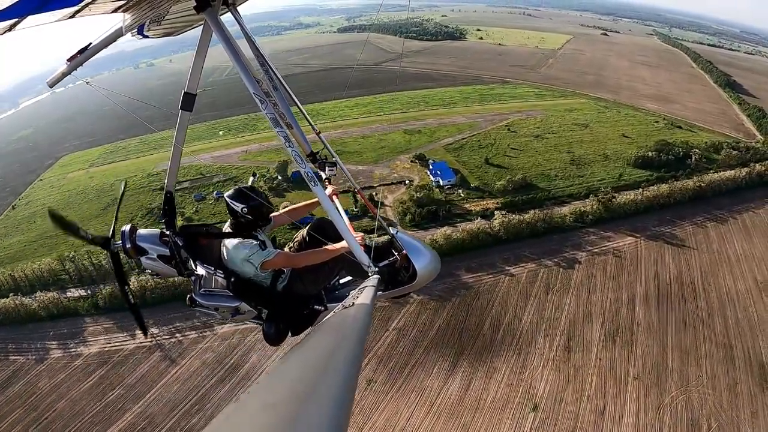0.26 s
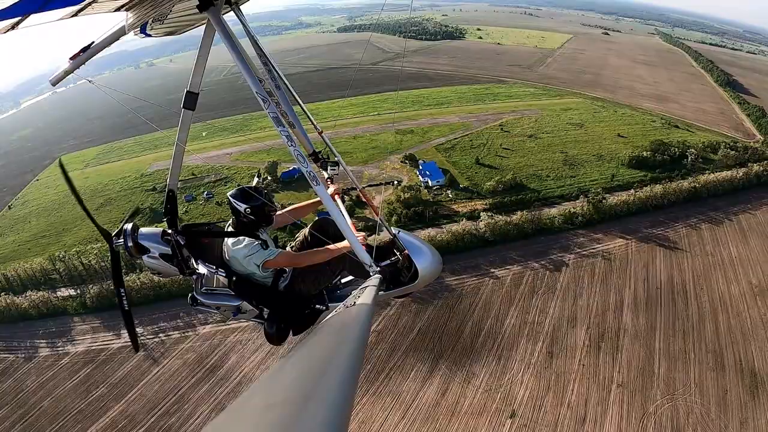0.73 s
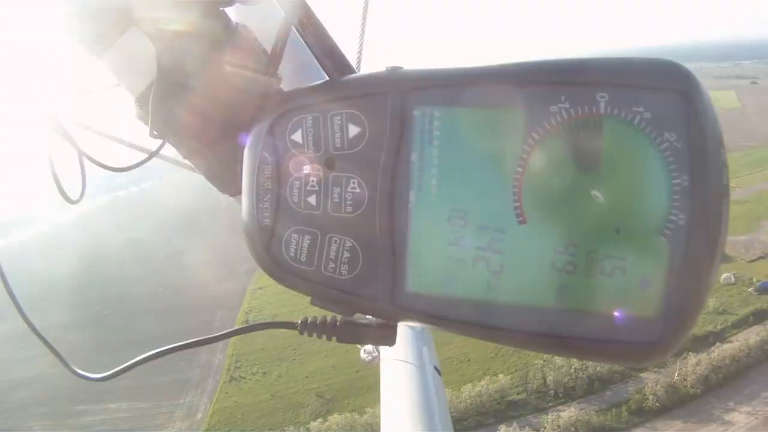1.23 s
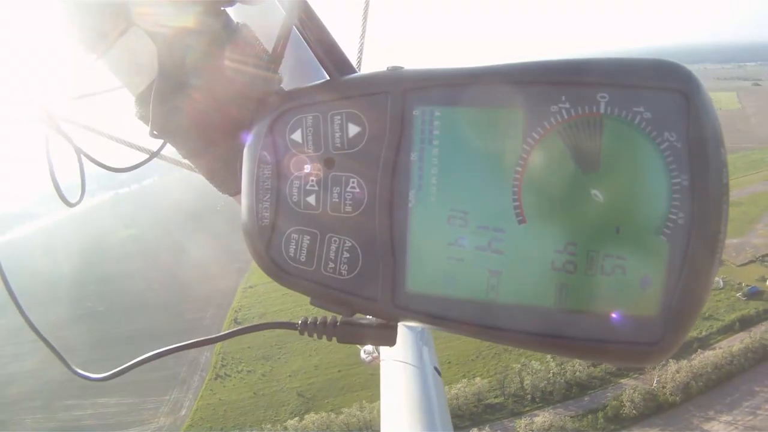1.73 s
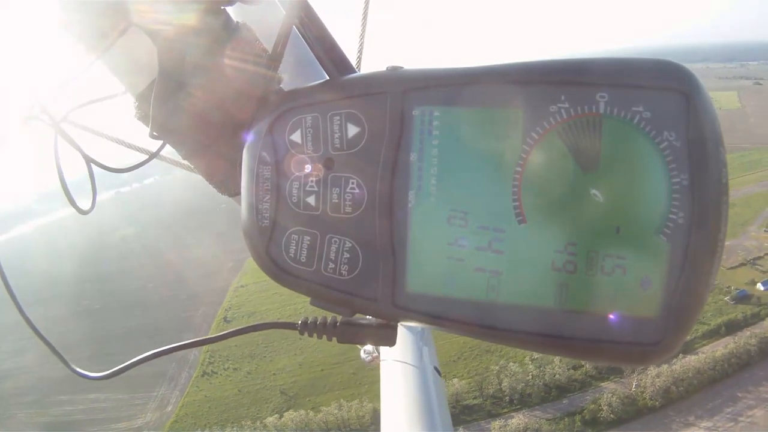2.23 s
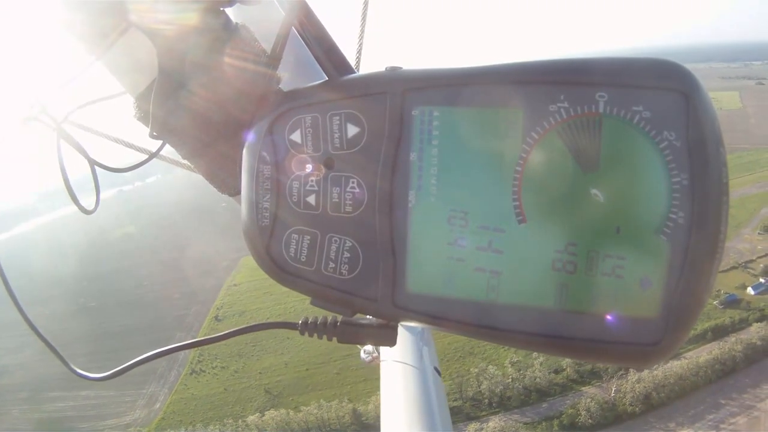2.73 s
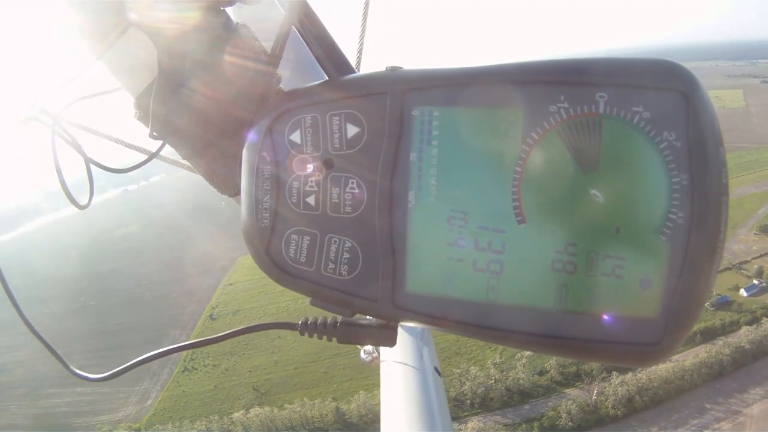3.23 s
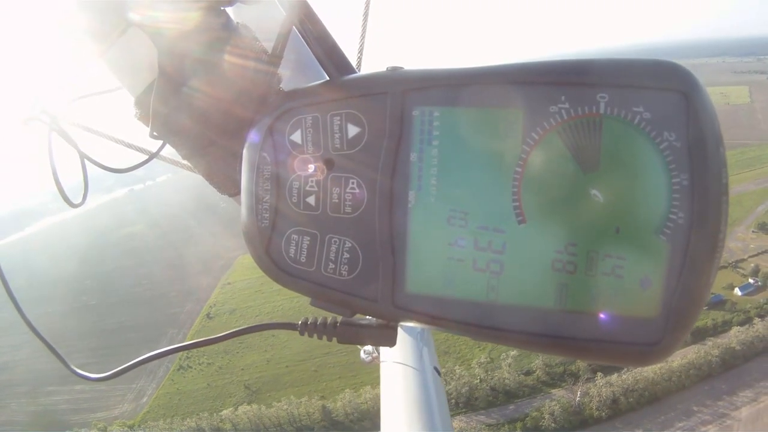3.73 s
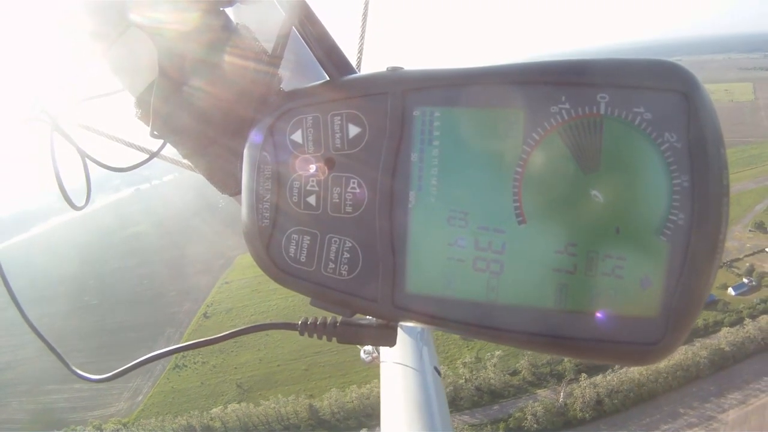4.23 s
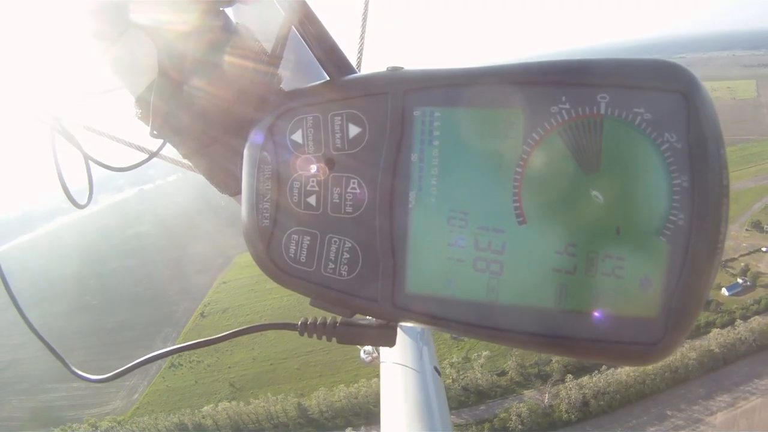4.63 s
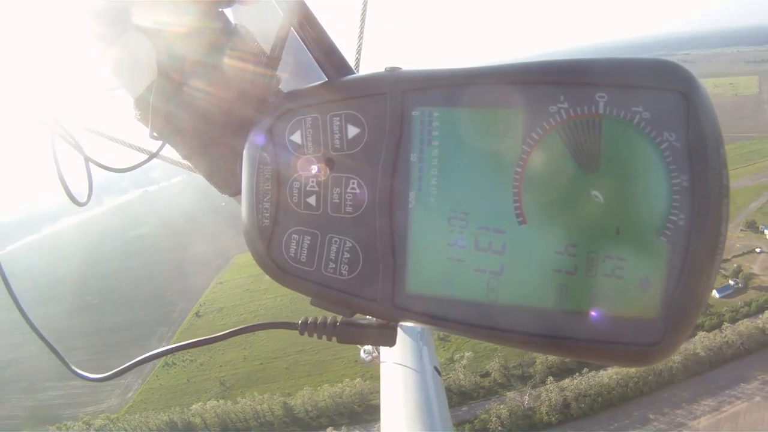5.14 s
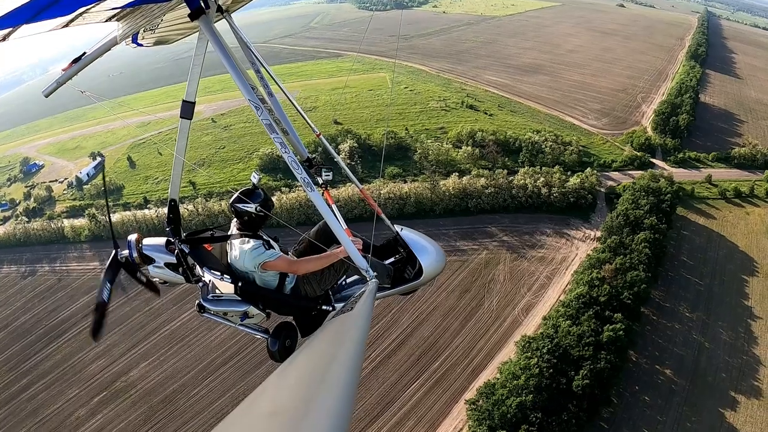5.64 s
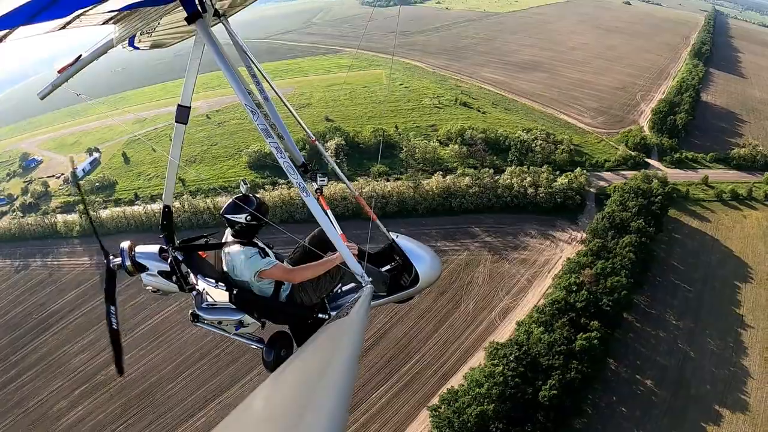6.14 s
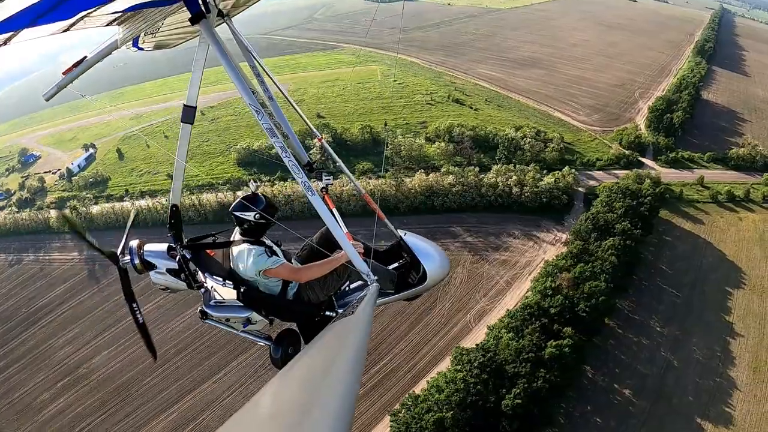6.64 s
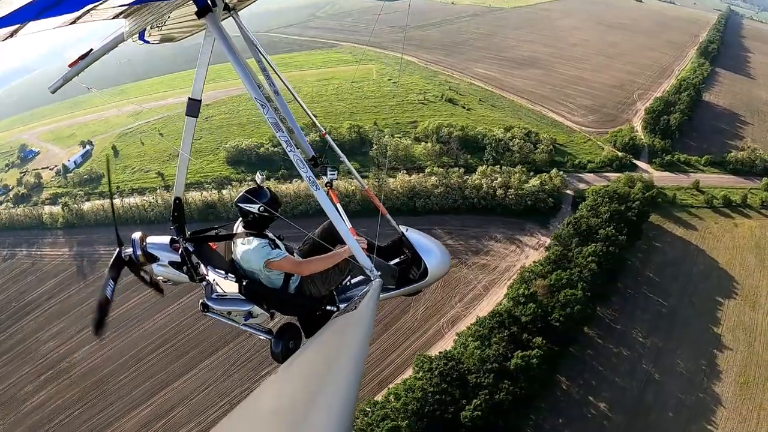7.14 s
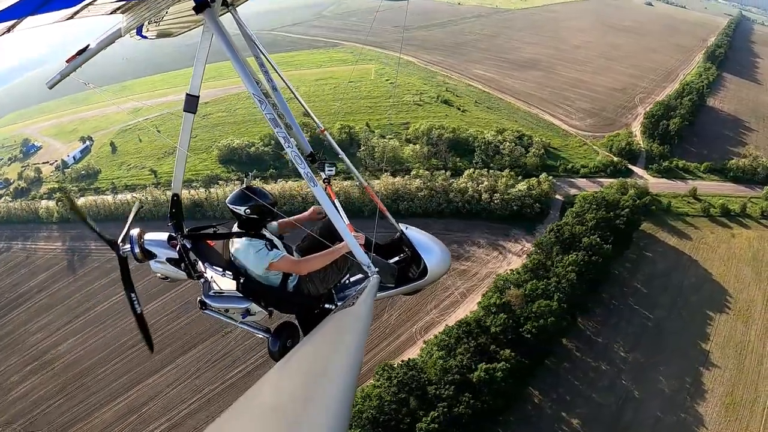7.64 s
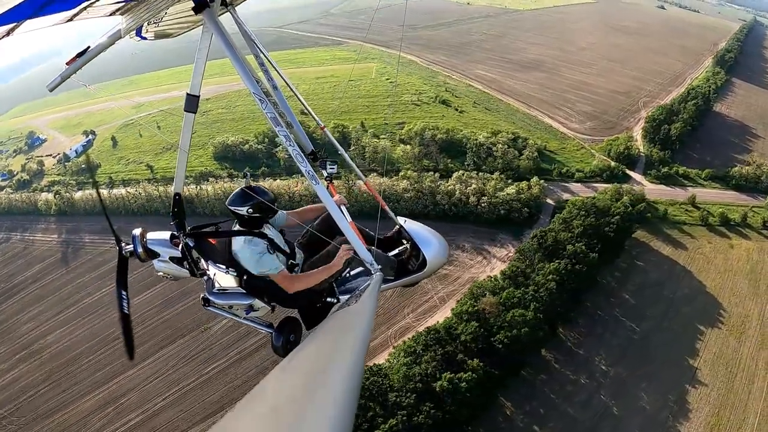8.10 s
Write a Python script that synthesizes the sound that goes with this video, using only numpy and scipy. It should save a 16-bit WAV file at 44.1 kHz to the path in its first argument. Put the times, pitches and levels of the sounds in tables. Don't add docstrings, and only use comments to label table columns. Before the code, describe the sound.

Open-air wind buffeting, then a sheltered airy hiss with throbbing propeller hum and loose plastic clicks, then stronger, crackling wind buffeting.

```python
import sys
import numpy as np
from scipy import signal
from scipy.fft import rfft, irfft, next_fast_len
from scipy.io import wavfile
from scipy.ndimage import uniform_filter1d

SR = 44100
rng = np.random.default_rng(int(sys.argv[2]) if len(sys.argv) > 2 else 0)


def amplitude_ratio(level_db):
    exponent = np.asarray(level_db, float) / 20
    return 10 ** exponent


def waveform_to_disk(signal):
    frames = np.transpose(np.atleast_2d(signal))
    scaled = np.clip(frames, -1, 1) * 32767
    samples = np.round(scaled).astype(np.int16)
    wavfile.write(sys.argv[1], SR, samples)


N = 369116

FRAME_FROM_S, FRAME_TO_S = 1.1215, 5.2925
BLADES = 3
WEAK_EDDY_DB = -41
FFT_N = next_fast_len(N)
FFT_HZ = np.maximum(np.arange(FFT_N // 2 + 1) * SR / FFT_N, 1)
# [t/s, level/dB]
GUST_CURVE = [(0.05, -2), (0.32, -2.5), (0.55, -2), (0.86, -1), (1.1, -1), (5.3, -0.5), (5.46, -1.5),
              (5.75, 0), (6.08, 1), (6.44, -0.5), (6.68, 1), (6.8, -0.5), (7.1, 1.5), (7.3, -1), (7.52, -3),
              (7.8, 0), (8.12, 3), (8.3, -0.5)]


def rms_one(x):
    return x / np.sqrt(np.mean(x ** 2) + 1e-20)


def in_time(rows):
    s, *columns = np.transpose(rows)
    return [np.interp(np.arange(N) / SR, s, column) for column in columns]


def at_hz(points, hz):
    point_hz, point_db = np.transpose(points)
    return np.interp(np.log(hz), np.log(point_hz), point_db)


def drift(rate):
    r = np.exp(-40 * np.pi * rate / SR)
    coarse = rng.standard_normal(N // 20 + 4002)
    slow = signal.lfilter([1], [1, -2 * r, r * r], coarse)[4000:]
    return np.interp(np.arange(N) / 20, np.arange(len(slow)), rms_one(slow))


def ringing(hz, t60):
    t = np.arange(int(.1 * SR)) / SR
    return np.sin(2 * np.pi * hz * t) * amplitude_ratio(-60 * t / t60)


def add(out, s, sound):
    i = round(s * SR)
    out[i:i + len(sound)] += sound[:N - i]


def eddies():
    # [t/s, peak level/dB]
    strong = [(0.2828, -29.5), (0.3391, -32.5), (0.4673, -25.5), (0.6574, -29), (0.7687, -27),
              (5.5662, -29), (5.6411, -31.5), (5.7154, -21), (5.7798, -28.5), (5.8152, -33),
              (6.0437, -25.5), (6.0726, -18), (6.1459, -24), (6.2946, -18), (6.3779, -31.5),
              (6.4602, -31.5), (6.5824, -37.5), (6.6697, -33.5), (6.8443, -23.5), (6.9631, -32.5),
              (7.2933, -26), (7.6984, -31), (7.7488, -25), (7.8979, -27.5), (8.0202, -24), (8.0471, -25),
              (8.1594, -28), (8.1778, -22.5), (8.2846, -31.5), (8.337, -38.5)]
    weak_count, spread_db = 80, 4.0
    when = rng.uniform(0, N / SR, weak_count)
    peak_db = WEAK_EDDY_DB + spread_db * rng.standard_normal(weak_count)
    return np.r_[strong, np.c_[when, peak_db]]


def kicks(rows):
    out = np.zeros(N)
    decay = np.exp(-np.arange(2000) / SR / .009)
    for s, peak_db in rows:
        lift_db = np.clip(.33 * (peak_db + 46), 0, 9)
        add(out, s, lift_db * decay)
    return uniform_filter1d(uniform_filter1d(out, size=120), size=120)


def wind(rows):
    # [f/Hz, density/dB per Hz]
    buffet = [(7.1, -45.5), (12, -34), (26, -7), (65, -1.5), (114, 1), (177, -7), (251, -10.5),
              (909, -14.5), (1490, -21.5), (2180, -29.5), (3100, -37), (6080, -57), (13000, -80)]
    flutter_db, puff_db, own_db = 1.4, 0.63, 0.5
    gust_from_hz, gust_full_hz, calm_hz = 600, 2200, 9000
    gust_db, = in_time(GUST_CURVE)
    edge_db = .6 * gust_db + 1.8 * drift(8.8)
    flutter = flutter_db * (drift(53) + 1.36 * drift(150))
    gust = gust_db + puff_db * drift(6.8) + kicks(rows) + flutter
    air = rfft(rng.standard_normal(FFT_N)) * amplitude_ratio(at_hz(buffet, FFT_HZ))
    out = np.zeros(N)
    for centre_hz in 16 * 2. ** np.arange(11):
        window = np.cos(np.pi / 2 * np.clip(np.log2(FFT_HZ / centre_hz), -1, 1)) ** 2
        share = np.interp(np.log(centre_hz), np.log([gust_from_hz, gust_full_hz, calm_hz]), [0, 1.2, .3])
        edge = (centre_hz == 4096) * edge_db
        out = out + irfft(air * window, FFT_N)[:N] * amplitude_ratio(share * gust + edge + own_db * drift(14))
    return amplitude_ratio(-15) * rms_one(out)


def snaps(rows):
    small_per_s, small_db = 110, -40
    out = np.zeros(N)
    dull, bright = ringing(3800, .004)[:300], ringing(6500, .002)[:300]
    for s, peak_db in rows:
        bright_db = -16 + (.7 - 1) * (peak_db - WEAK_EDDY_DB)
        add(out, s + .001, amplitude_ratio(peak_db + 1.5) * (dull - amplitude_ratio(bright_db) * bright))
    sizes = amplitude_ratio(4.5 * np.minimum(rng.exponential(1, N), 3.)) * rng.choice([-1, 1], N)
    struck = rng.random(N) < small_per_s / SR
    small = sizes * struck * amplitude_ratio(1.5 * in_time(GUST_CURVE)[0] + small_db)
    dealt = rng.integers(0, 3, N)
    for k, (hz, level_db) in enumerate([(1900, 12), (2900, 7), (4300, -4)]):
        tick = ringing(hz, 6 / hz)[:300]
        out = out + amplitude_ratio(level_db) * np.convolve(small * (dealt == k), tick)[:N]
    return signal.sosfilt(signal.butter(3, [1200, 6500], "band", fs=SR, output="sos"), out)


def limiter(x):
    top_db, release_db_s, ratio = -8.5, 90, 1.95
    fall = release_db_s * np.arange(N) / SR
    peak_db = np.maximum.accumulate(20 * np.log10(np.abs(x) + 1e-9) + fall) - fall
    cut_db = np.maximum(peak_db - top_db, 0) * (1 - 1 / ratio)
    ahead = np.r_[cut_db[44:], np.full(44, cut_db[-1])]
    return x * amplitude_ratio(-uniform_filter1d(ahead, size=110))


def crackles():
    # [t/s, peak level/dB]
    bursts = [
        (0.0014, -62),
        (7.1232, -42),
    ]
    out = np.zeros(N)
    decay_db = -60 * np.arange(600) / SR / .03
    for s, peak_db in bursts:
        add(out, s, amplitude_ratio(peak_db - 3 + decay_db) * rng.standard_normal(600))
    return signal.sosfilt(signal.butter(4, [3500, 10800], "band", fs=SR, output="sos"), out)


def from_midway():
    return np.arange(N) / SR - (FRAME_FROM_S + FRAME_TO_S) / 2


def shaft_turns():
    # [t/s, speed/turns per s]
    speed = [(1.12, 9.58), (1.6, 9.513), (2.1, 9.446), (2.6, 9.365), (3.1, 9.297), (3.6, 9.23),
             (4.1, 9.169), (4.6, 9.128), (5.3, 9.115)]
    return 2 * np.pi * np.cumsum(in_time(speed)[0]) / SR - .77


def motor(angle):
    # [t/s, level/dB]
    shake = [(1.13, -26), (1.17, -25.5), (1.97, -25.5), (2.26, -29), (2.42, -25.5), (2.6, -31.5),
             (2.8, -32.5), (2.9, -25), (3.0, -28.5), (3.59, -25), (3.72, -28), (4.55, -29), (4.8, -31.5),
             (4.9, -28.5), (5.28, -29.5)]
    # [t/s, phase/rad]
    shake_lead = [(1.15, -.8), (3.75, 3.85), (5.3, 4.7)]
    multiples = [6, 9, 14, 20, 21, 36, 37, 38, 39, 40, 41, 42, 43]
    # [level midway/dB rms, change/dB per s]
    orders = [(-42, 0.9), (-60, 1), (-52.5, 0.5), (-54.5, 2.5), (-55.5, 3.5), (-62, -1), (-47, -1.5),
              (-81, -3), (-57, -5.5), (-83, 13), (-56.5, 1.5), (-48.5, -0.1), (-61, 4.5)]
    # [f/Hz, level/dB rms]
    whine = [
        (48.5, -63),
        (1487, -50),
    ]
    reverses_s, null_s = 2.68, 0.057
    sagging, sag_s, sag_width_s, sag_db = 42, 3.1, .6, -11
    t = np.arange(N) / SR
    side = np.tanh(((reverses_s - t) / null_s) ** 3)
    shake_gain = side * amplitude_ratio(in_time(shake)[0] + 0.67 * drift(5.7))
    out = shake_gain * np.sin(BLADES * angle + in_time(shake_lead)[0])
    for multiple, (level_db, change_db) in zip(multiples, orders):
        now_db = level_db + change_db * from_midway()
        if multiple == sagging:
            now_db = now_db + sag_db * np.exp(-((t - sag_s) / sag_width_s) ** 2)
        out = out + amplitude_ratio(now_db + 1.2 * drift(3)) * np.cos(multiple * angle + .12 * drift(1.5))
    for hz, level_db in whine:
        out = out + amplitude_ratio(level_db + 1.5 * drift(4)) * np.sin(2 * np.pi * hz * t + .8 * drift(5))
    return np.sqrt(2) * out


def rush(angle):
    # [f/Hz, density/dB per Hz]
    sheltered = [(12, -34), (40, -8), (240, -8), (320, -14), (430, -17), (510, -24), (860, -17.5),
                 (880, -12.5), (1700, -15.5), (2700, -13), (4300, -20), (4700, -25.5), (5500, -22.5),
                 (6000, -33)]
    # [f/Hz, width/Hz, lift/dB]
    case = [(120, 5, -5), (131, 9.1, 5.5), (189, 10.6, 6.5), (730, 50, 4.5), (830, 53, -3), (880, 81, 2),
            (1109, 50, 6), (1324, 97, -6.5), (2125, 410, 8), (3080, 280, -4), (3554, 220, 7.5),
            (4110, 90, 5)]
    throb_db, patchy_db = 0.5, 0.5
    colour_db = at_hz(sheltered, FFT_HZ)
    for centre_hz, width_hz, lift_db in case:
        colour_db = colour_db + lift_db / (1 + (2 * (FFT_HZ - centre_hz) / width_hz) ** 2)
    air = rms_one(irfft(rfft(rng.standard_normal(FFT_N)) * amplitude_ratio(colour_db), FFT_N)[:N])
    steady_db = -32.5 - 0.12 * from_midway()
    return air * amplitude_ratio(steady_db + throb_db * np.sin(BLADES * angle) + patchy_db * drift(41))


def knocks():
    # [t/s, peak level/dB, pitch of the part f/Hz]
    hits = [(1.1824, -22, 1760), (1.1933, -12.5, 1950), (1.2186, -23, 1500), (1.2537, -20.5, 1580),
            (1.8475, -19.5, 1820), (1.881, -23, 1800), (1.919, -26, 1970), (1.9494, -21.5, 1940),
            (1.993, -31, 1490), (2.0256, -24.5, 1850), (2.2068, -21, 1980), (2.242, -27, 1800),
            (2.7454, -21.5, 1520), (2.778, -19, 1810), (2.822, -23, 1480), (2.848, -19.5, 1800),
            (2.964, -20, 1560), (3.4188, -29, 1940), (3.4989, -22, 1480), (3.534, -21.5, 1520),
            (3.568, -22, 1810), (3.6074, -19, 1630), (3.64, -23, 1950), (4.8407, -23, 1980)]
    # [f/Hz, level/dB, t60/s]
    modes = [(1100, -3, 0.024), (1480, -12, 0.12), (1775, -0.5, 0.019), (1940, -1, 0.02), (2120, 2, 0.068),
             (2560, -36, .03), (3500, -18, 0.026)]
    # [t/s, level/dB]
    hollow = [(1.2, -7), (1.9, 9), (2.22, 13), (2.78, 2), (2.96, 6), (3.55, 6)]
    out = np.zeros(N)
    for s, peak_db, part_hz in hits:
        spread = rng.standard_normal(len(modes) + 1)
        lift_db = 0.66 * spread[:-1]
        lift_db[0] += np.interp(s, *np.transpose(hollow))
        body = sum(amplitude_ratio(mode_db + lift) * ringing(hz, t60) for (hz, mode_db, t60), lift in zip(modes, lift_db))
        part = amplitude_ratio(peak_db - 6) * ringing(part_hz, .024)
        contact = amplitude_ratio(peak_db - 3.5) * ringing(1700, .005)
        rebound = amplitude_ratio(peak_db - 12 + 2 * spread[0]) * ringing(2120, .022)
        add(out, s, amplitude_ratio(peak_db - 14) * body)
        add(out, s + .00206 + .00025 * spread[-1], amplitude_ratio(peak_db - 11) * body)
        add(out, s + .0006, part + contact)
        add(out, s + .0035 + .0008 * spread[-2], rebound)
    return signal.sosfilt(signal.butter(4, 900, "high", fs=SR, output="sos"), out)


def held_converter(x):
    slow_rate_hz, repeats = 12000, 4
    slow = signal.resample_poly(x, slow_rate_hz, SR)
    return signal.resample_poly(np.repeat(slow, repeats), SR, slow_rate_hz * repeats)[:N]


def scene():
    t, rows, angle = np.arange(N) / SR, eddies(), shaft_turns()
    limited = limiter(wind(rows) + snaps(rows))
    pole = signal.sosfilt(signal.butter(6, 10500, fs=SR, output="sos"), limited) + crackles()
    shaken = motor(angle) + rush(angle) + knocks()
    frame = held_converter(np.r_[shaken, np.zeros(9)])
    fade_s = .002
    on_frame = np.clip(np.minimum(t - FRAME_FROM_S, FRAME_TO_S - t) / fade_s + .5, 0, 1)
    ending = np.clip((N / SR - t) / .00015, 0, 1)
    return ((on_frame * frame + (1 - on_frame) * pole) * ending)[None]


def top_cut(x):
    return signal.sosfilt(signal.butter(12, 15960, fs=SR, output="sos"), x)


def record(dry):
    mix = signal.sosfilt(signal.ellip(14, .2, 80, 15290, fs=SR, output="sos"), dry)
    return top_cut(mix)


dry = scene()
out = record(dry)
waveform_to_disk(out)
```